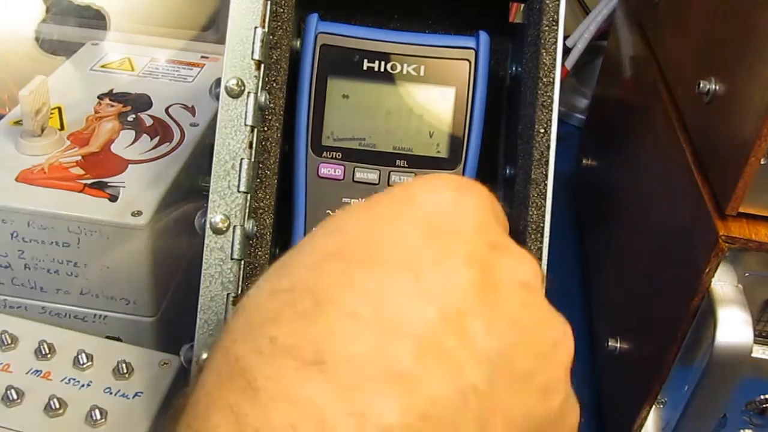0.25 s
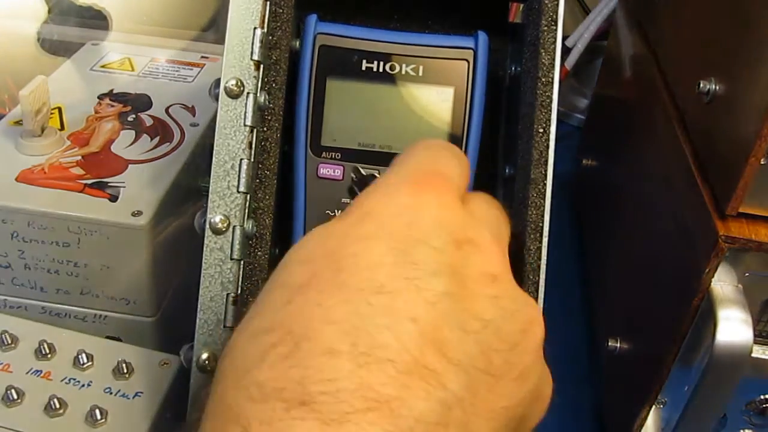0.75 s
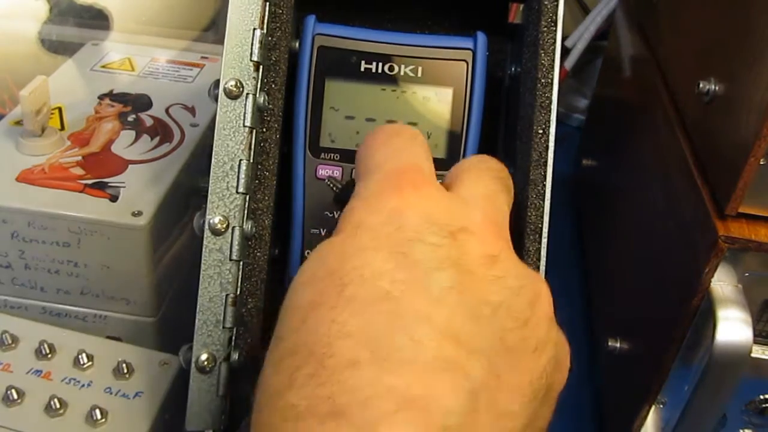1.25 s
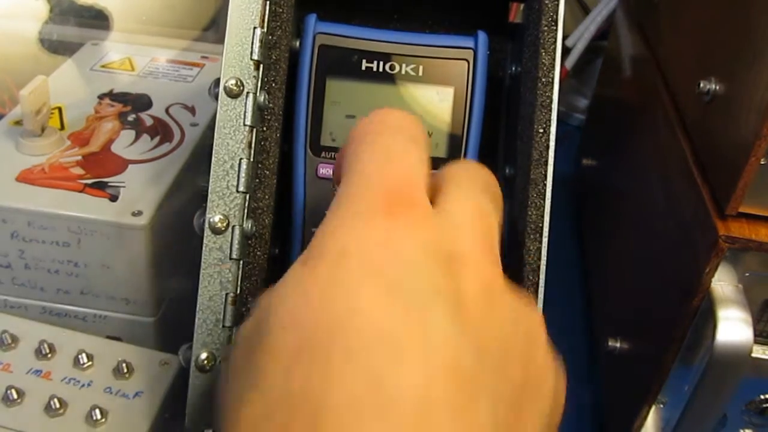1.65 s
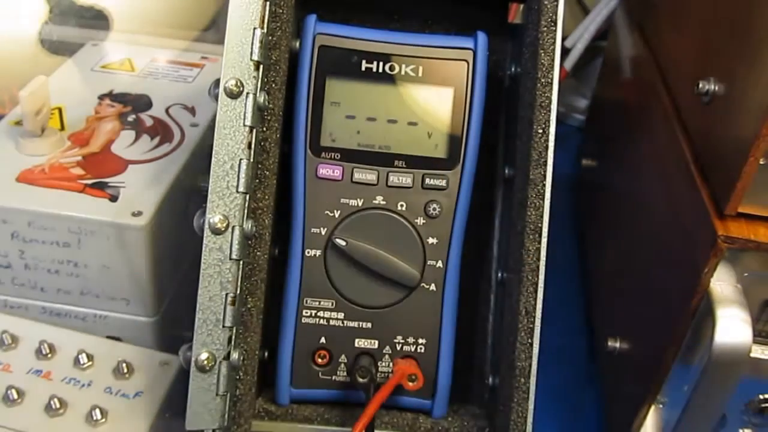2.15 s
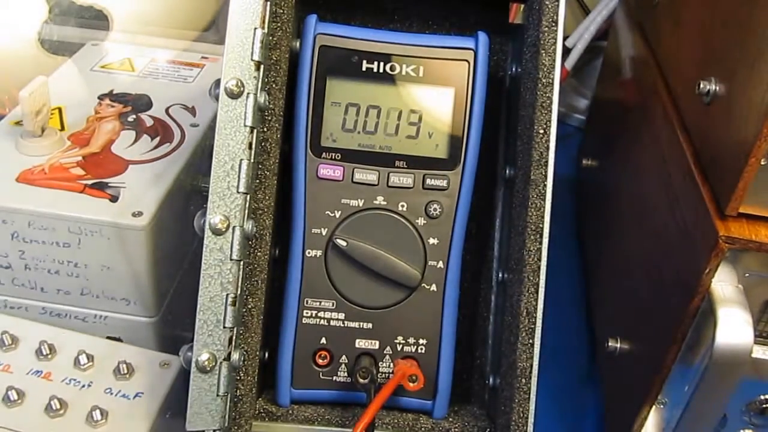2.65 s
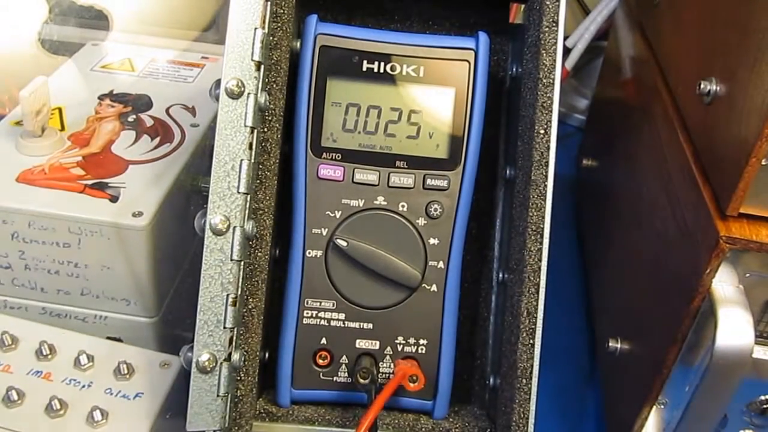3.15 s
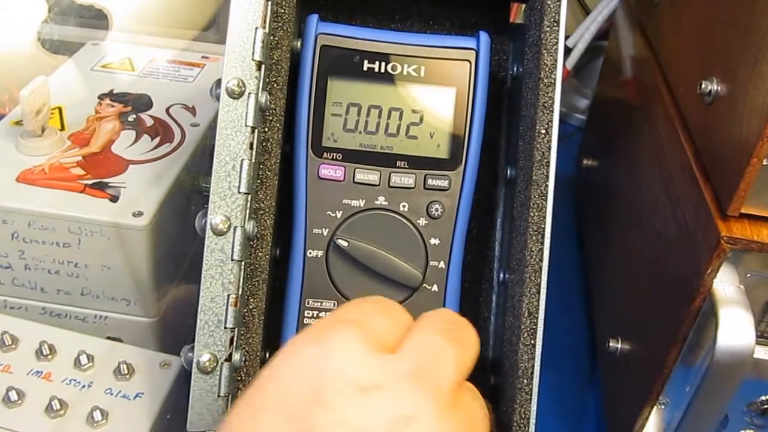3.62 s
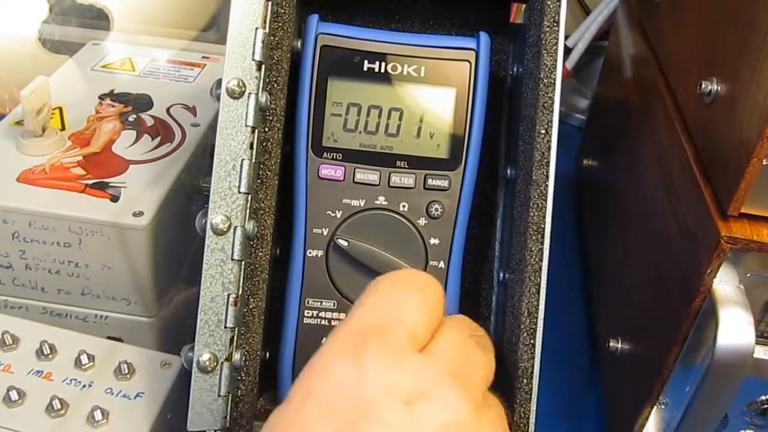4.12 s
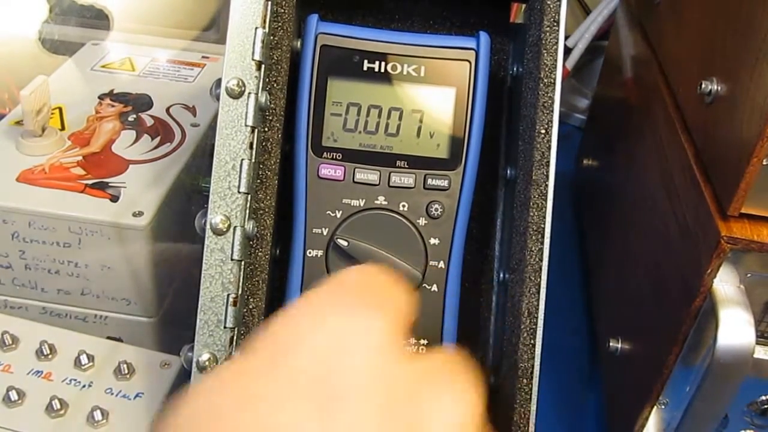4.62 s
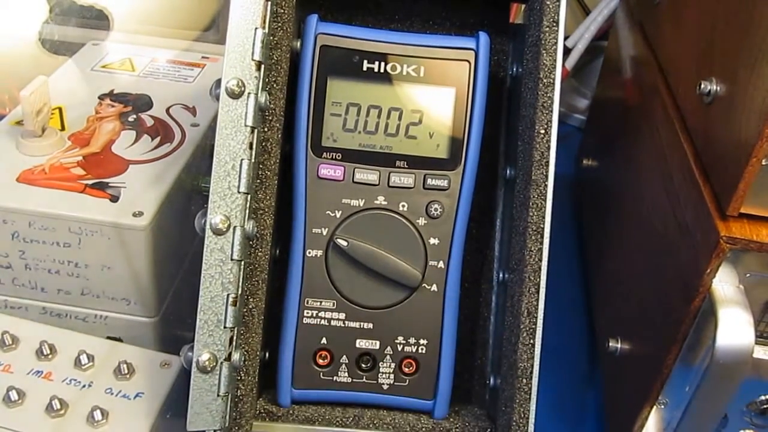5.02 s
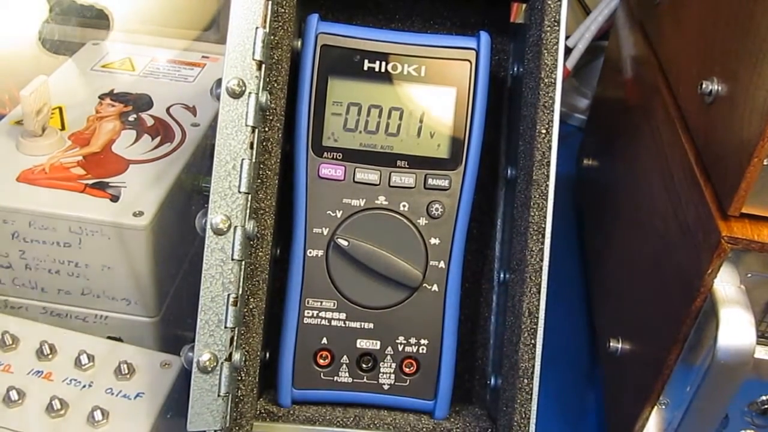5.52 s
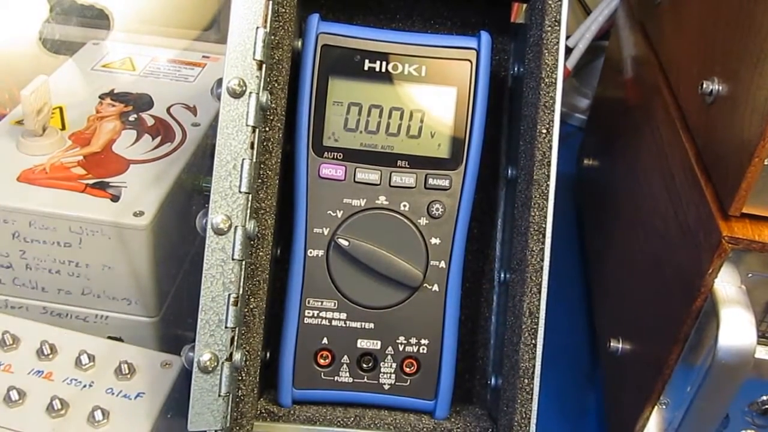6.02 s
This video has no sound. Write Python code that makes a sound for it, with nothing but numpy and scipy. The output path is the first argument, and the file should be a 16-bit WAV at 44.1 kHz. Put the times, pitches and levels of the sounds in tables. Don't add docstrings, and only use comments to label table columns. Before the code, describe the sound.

Six sharp dial clicks, scraping fingers and small plastic knocks as leads come out, then one loud hollow clatter on a bench in a quietly humming room.

```python
import sys
import numpy as np
from scipy import signal
from scipy.fft import rfft, irfft
from scipy.io import wavfile
from scipy.ndimage import uniform_filter1d

SR = 44100
rng = np.random.default_rng(int(sys.argv[2]) if len(sys.argv) > 2 else 0)


def boost_factor(decibels):
    exponent = np.asarray(decibels, float) / 20
    return 10 ** exponent


def unload_wav(signal):
    wavfile.write(
        sys.argv[1],
        SR,
        np.round(np.clip(np.atleast_2d(signal).T, -1, 1) * 32767).astype(np.int16),
    )


N = 276595

# frequency in Hz, level in dB per Hz.
HUSH = [(12, -32.5), (25, -17), (50, -19), (65, -15.5), (100, -18.5), (135, -15), (175, -18), (230, -18),
        (300, -24.5), (446, -24), (558, -26.5), (1060, -31), (1760, -33.5), (2080, -35), (16000, -54.5)]
# frequency in Hz, level in dB, line width in Hz.
HUM = [(94, -58.5, 9), (120.4, -52.5, 2.5), (149.1, -48.5, 0.49), (212, -61, 19), (240.3, -63.5, 3),
       (1045, -68.5, 16)]
# frequency in Hz, likeness from -1 to 1.
DIFFUSE_COHERENCE = [(60, 0.63), (130, 0.87), (290, 0.79), (640, 0.67), (1410, 0.4), (3100, -0.023),
                     (6820, -0.072), (15000, 0.17)]
# frequency in Hz, likeness from -1 to 1.
NEAR_COHERENCE = [(200, 1), (640, .985), (1400, .87), (3100, .75), (6800, .87), (11000, .8), (15000, .35)]
# frequency in Hz, t60 in seconds.
ROOM_T60 = [(250, 0.17), (700, 0.3), (1800, 0.22), (4600, 0.15), (12000, 0.2)]
# frequency in Hz, width in Hz.
NOTCHES = [(5925, 69), (7825, 290)]

# frequency in Hz, level in dB per Hz.
CLOTH = [(300, -0.5), (700, 0.5), (1500, -1), (3000, 1), (5500, -0.5), (9000, -5), (12000, -12.5),
         (16000, -56.5)]
# peak in seconds, level in dB, brightness in dB, rise and fade in seconds per 10 dB.
RUBS = [(.292, -52, -3, -0.16, 0.05), (.412, -61, -9, 0, 0.5), (1.26, -60.5, -6.5, 0.5, 0.05),
        (1.39, -54, -8.5, 0, 0), (1.56, -57, -22.5, 0, 0.32), (1.66, -58.5, -5.5, -0.14, 0.08),
        (1.95, -64, 1, 0.04, -1.9), (2.4, -52, -16.5, 0, 0.47), (2.92, -53.5, -7.5, 0.49, 0.18),
        (3.272, -55.5, -5, 0.02, -0.1), (3.448, -53.5, 2.5, -0.02, 0.09), (3.74, -58.5, -10, 0.2, 0.65),
        (3.98, -43, -22, 0.14, -0.17), (4.082, -55.5, 8.5, 0.03, 0.05), (4.2, -55, -15, -0.5, 0.4),
        (4.44, -52.5, -1, 0, 0.13), (3.765, -52.5, 5.5, -0.03, 0.12), (5.4, -56.5, -11, 0.35, .5),
        (5.445, -54.5, 1.5, 0.2, 0.2), (5.81, -51.5, -15.5, .5, 0.14), (6.0, -51, -1, 0.3, 0.06),
        (6.06, -53, -25, -0.2, 0.15)]
# start in seconds, peak in dB, t60 in seconds.
SCUFFS = [
    (3.2719, -39.5, 0.41),
    (3.3465, -42, 0.28),
    (4.996, -41, 0.22),
    (5.19, -41.5, 0.58),
]
# peak in seconds, level in dB, brightness in dB, rise and fade in seconds per 10 dB.
DRAGS = [(.3, -57, 7, -0.2, -0.3), (.386, -54, -0.5, 0.15, -0.5), (.612, -46.5, -6, 0.23, -0.24),
         (1.1, -46, -12, -0.3, 0.03), (1.205, -41, 0.5, -0.02, 0.11), (1.39, -49, 4.5, -0.01, 0.02),
         (1.575, -44.5, -1.5, 0.08, 0.01), (3.59, -54, 1.5, 0.03, 0.1), (3.855, -48, -22, 0.1, 0.07),
         (3.965, -45, 2, 0.1, -0.15), (4.2, -43.5, -16, 0.07, 0.2), (4.384, -40.5, 1, 0.04, -0.05),
         (4.31, -46, -3, 0.08, 0), (4.46, -40, -1.5, 0.0551, 0.03)]

# frequency in Hz, width in Hz, level in dB.
CASE = [(682.4, 12, -3.5), (969, 26, -4), (1450, 31, -7.5), (1730, 39, 1), (2720, 990, -6),
        (4840, 160, 5.5), (5286, 260, 4), (6890, 520, 1.5), (7880, 260, 0), (9770, 540, -10),
        (10830, 700, -17), (11630, 600, -31), (12600, 660, -35), (14000, 900, -38), (15300, 600, -33.5)]
# start in seconds, 1.2-4 kHz
# peak in dB, treble against it in dB, ring in Hz, length in ms.
TICKS = [(0.2967, -30.5, -21, 1420, 1.7), (1.2493, -35.5, 1.5, 4300, 1.9), (2.3175, -38, -3.5, 3690, 1.6),
         (3.0555, -30.5, 1, 6560, 0.93), (3.5916, -32, -5, 1430, 3.9), (3.7194, -25.5, -8.5, 3170, 0.56),
         (3.7925, -34, -15, 1520, 8.7), (4.0497, -43, 6, 3600, 2.4), (4.2468, -37, -5, 4200, 1.5),
         (5.4335, -31.5, 9.5, 6300, 0.47), (5.4521, -32.5, 1, 2560, 1.2), (5.9652, -27, -4, 1186, 3.9),
         (6.0227, -33, -6, 1150, 1.1)]
TAPS = [(0.2146, -35.5, -13, 1380, 2.6), (0.389, -29, -15, 1550, 0.66), (0.4756, -46, -4, 1470, 5.8),
        (0.5452, -53, -10, 1500, 2.5), (1.1747, -37.5, -16.5, 1450, 11), (1.5424, -53, -12, 1800, 1.56),
        (3.5765, -36, -8, 1760, 1.5), (3.6444, -38, -3.5, 1220, 2.1), (3.836, -40, 2, 3900, 2.1),
        (3.9855, -29, -9, 2400, 2.8), (4.0178, -42, 5, 1520, 2), (4.124, -33, -18, 1800, 1.4),
        (4.4785, -35, -15, 1830, 3.7), (4.543, -24, -25, 1230, 2.1), (4.5655, -35, -8, 1500, 2.2),
        (5.7195, -28.5, -9, 1540, 4.4), (5.79, -30.5, -6, 2500, 5), (5.919, -25, -5.5, 3790, 2)]
PULLS = [
    (3.9724, -28, 1.5, 2390, 1.2),
    (4.1618, -18, -21, 1990, 0.67),
]
FLICKS = [
    (1.5605, -32.5, -17, 1800, 4),
    (1.5848, -12, -12, 2900, 0.33),
    (1.648, -35, -10, 2270, 4.7),
    (3.7468, -42.5, 0, 1320, 5.2),
    (3.803, -38, -15, 2900, 1.7),
    (3.886, -38.5, -6, 1340, 4),
    (4.2855, -43, -14, 1900, 7),
    (4.503, -42, -13, 2600, 2),
    (4.638, -54, 0, 3900, 1),
]
# start in seconds, 1.2-4 kHz peak in dB, bass against it in dB, ring in Hz, length in ms.
KNOCKS = [(1.1879, -38.5, -1.5, 579, 9.2), (1.8827, -32.5, -3, 585, 1.46), (3.8504, -43, 6, 716, 1.1),
          (3.884, -46, 7.5, 685, 2.1), (3.9724, -21, 3, 820, 2.4), (4.1619, -25, 9, 790, 2.44),
          (4.1744, -34.5, 12.5, 670, 2.4), (4.2205, -43, 14.5, 817, 3.6), (4.2976, -42, 14, 790, 2.5),
          (4.3789, -31.5, 6.5, 783, 2), (4.4405, -37.5, 11, 660, 6.5), (4.4654, -37, 7.5, 668, 5)]
NUDGES = [(1.655, -43, 8.5, 620, 4), (3.5637, -54.5, 8, 606, 2.5), (3.667, -50, 8, 590, 1.6),
          (3.836, -45, 9.5, 730, 2.1), (3.946, -36.5, 4, 628, 5.7), (3.9862, -32.5, 3.5, 626, 2.2),
          (4.066, -43, 8, 650, 4), (4.188, -46, 13, 800, 2.2), (4.232, -47, 14, 706, 2.8),
          (4.37, -36.5, 5.5, 930, 6.4), (4.4222, -39, 4, 760, 3.8), (4.455, -42.5, 14, 680, 2.4),
          (4.508, -40.5, 8.5, 770, 3.4), (4.522, -41.5, 5, 815, 3)]
# start in seconds, peak in dB, ring in Hz, width in Hz.
PINGS = [(.622, -31, 380, 90), (1.036, -33, 400, 90), (1.582, -26, 390, 90), (1.586, -31, 2920, 25),
         (1.0385, -20, 1440, 45), (3.592, -38, 3100, 90), (3.592, -42, 4300, 110), (3.794, -41, 4200, 110),
         (4.247, -40, 3080, 80), (4.478, -40, 4300, 110), (4.379, -36, 2600, 120), (.41, -45, 1010, 15),
         (.7145, -20, 690, 22), (.877, -41, 1500, 60), (1.024, -41, 1550, 30), (1.038, -28, 830, 50),
         (3.85, -32, 700, 25), (5.968, -21, 430, 14), (6.15, -46, 420, 10), (3.9725, -27, 4300, 400),
         (.7695, -17, 2900, 180), (3.885, -33, 720, 45), (5.437, -41, 2650, 30), (5.53, -45, 1050, 15),
         (.624, -25, 720, 30), (4.162, -24, 2500, 150), (4.163, -24, 1800, 90)]
GLINTS = [(1.0384, -20.5, 1750, 120), (3.803, -36, 1410, 120), (3.973, -27, 3000, 250),
          (3.987, -23, 4420, 500), (5.434, -30, 10500, 1490), (5.4345, -38, 13500, 1500),
          (5.8805, -17, 246, 28), (5.872, -27, 140, 25), (4.371, -36, 1800, 150), (4.4535, -32, 690, 35),
          (4.4655, -27, 680, 50), (4.5435, -30, 950, 220), (4.379, -30, 830, 45), (4.511, -36, 760, 50),
          (5.8735, -17, 1163, 30), (5.874, -22, 3300, 300), (5.882, -24, 2340, 120),
          (5.892, -28, 2900, 250), (5.9075, -17, 600, 90), (5.92, -22, 600, 80), (.7135, -24, 3200, 400),
          (.6215, -22, 1470, 60), (5.7205, -31, 3300, 700), (5.721, -33, 4600, 500),
          (5.7285, -32, 3600, 900), (5.7915, -35, 4000, 600), (5.921, -36, 12500, 2500),
          (5.9665, -32, 10500, 2500), (4.1625, -19, 1300, 500), (4.169, -33, 4200, 200),
          (1.205, -40, 1900, 300), (3.951, -36, 3200, 300)]
# frequency in Hz, width in Hz, level in dB.
ZIP_RING = [(3600, 700, -5), (5000, 600, -2.5), (7000, 650, 1), (9300, 700, 1), (12800, 900, -13)]

# frequency in Hz, level in dB, t60 in seconds.
HOLLOW = [(160, -24, .03), (246, -6, 0.073), (303, -13, 0.11), (408, 1.5, .055), (435, -2.5, .08),
          (585, -5.5, 0.063), (668, -11, .07), (934, -13, 0.044), (1168, -10, 0.058), (1490, -17.5, 0.027),
          (1840, -9.5, 0.0154), (2320, -14.5, 0.017), (2900, -11.5, .01), (4046, -13, 0.0056)]
# start in seconds, peak in dB, contact in ms, hardness above 900 Hz in dB.
BOUNCES = [
    (5.872, -2, 2.25, 2),
    (5.8808, -8, 1.5, -1),
    (5.9045, -15.5, 2, 3),
    (5.908, -8.5, 4.3, -4),
    (5.959, -18, 3.7, -9),
    (5.971, -23, 4.5, -2),
]
# time in seconds, level in dB, brightness in dB.
RATTLE = [
    (5.875, -19, -3.5),
    (5.957, -33, 2),
    (5.981, -28, -8),
    (6.013, -41, -7.5),
    (6.08, -54.5, 1),
]

# start in seconds, 2.1-3.5 kHz peak in dB,
# 3.5-6 kHz against it in dB, 6-9 kHz against it in dB, snap length in ms.
SNAPS = [
    (0.622, -10, -16, 1.5, 0.81),
    (0.7135, -12.5, -6, 2.5, 1),
    (0.7694, -7.5, -23, -7.5, 0.93),
    (0.8877, -9.5, -12, -11.5, 1.08),
    (1.037, -12.5, -9.5, -13.5, 1.3),
    (1.5821, -11.5, -8.5, -6.5, 1.65),
]
# four ring frequencies in Hz, 9-16 kHz against the 2.1-3.5 kHz peak in dB.
SPRING_RINGS = [
    (2590, 6730, 8180, 9500, -0.5),
    (2210, 6870, 8350, 11250, -5.5),
    (2860, 7300, 10000, 11780, -12.5),
    (2650, 7400, 9600, 10830, -6),
    (2820, 5600, 11000, 11300, -9.5),
    (2500, 6300, 7000, 10970, -6),
]
# start in seconds, peak in dB, low ring in Hz,
# panel ring in Hz, panel against the low ring in dB.
THUMPS = [
    (0.621, -19.5, 720, 1450, 2.5),
    (0.7125, -15.5, 675, 1430, -5),
    (0.768, -23.5, 589.5, 1630, 4),
    (0.886, -20.5, 990, 1730, 5.5),
    (1.036, -21.5, 586.4, 1515, 8),
    (1.5802, -13.5, 802, 1614, 0),
]
# start in seconds, peak in dB, ring in Hz, width in Hz.
CREAKS = [(.6985, -27, 1300, 130), (.705, -30, 1230, 130), (3.957, -29, 1850, 200), (1.803, -46, 2080, 150),
          (1.838, -48, 2070, 150), (3.84, -38, 2620, 30), (4.545, -31, 4505, 90), (5.454, -42, 2600, 35),
          (5.797, -38, 2530, 40), (5.794, -35, 540, 40), (1.195, -35, 575, 10), (.435, -49, 1500, 9),
          (.3, -46, 600, 12)]


def evened(x):
    return x / np.sqrt(np.mean(x ** 2) + 1e-20)


def read(points, hz):
    f, value = np.transpose(points)
    return np.interp(np.log(hz + 1), np.log(f + 1), value)


def add(mix, s, sound):
    part = mix[:, round(s * SR):][:, :sound.shape[1]]
    part += sound[:, :part.shape[1]]


def paired(a, b, same, hz):
    c = np.clip(read(same, hz), -1, 1)
    return np.array([a, c * a + np.sqrt(1 - c ** 2) * b])


def noise(level_db, same, patchy_db):
    t = np.arange(N // 128 + 6)[:, None] * 128 / SR
    hz = np.fft.rfftfreq(512, 1 / SR)
    a, b, c, d, patches = np.moveaxis(rng.standard_normal((len(t), 257, 5)), 2, 0)
    patches = uniform_filter1d(patches, size=12, axis=0)
    patches = evened(uniform_filter1d(patches, size=9, axis=1))
    z = paired(a + 1j * b, c + 1j * d, same, hz) * boost_factor(level_db(t, hz) + patchy_db * patches)
    return signal.istft(z.transpose(0, 2, 1), nperseg=512, noverlap=384)[1][:, :N]


def rings(modes, lo, hi, size=4096):
    t = np.arange(size) / SR
    x = np.zeros(size)
    for f, width, db in modes:
        if lo <= f < hi:
            x = x + boost_factor(db) * width * np.exp(-np.pi * width * t) * np.sin(2 * np.pi * f * t)
    band = signal.butter(2, [lo * .8, min(hi * 1.25, 16000)], "band", fs=SR, output="sos")
    return signal.sosfilt(band, x)


def knock(ms, bands, rise=0.35, grit_db=5, solid=0):
    u = np.arange(4096) / SR * 1000 / max(ms, .1)
    draw = rng.standard_normal((3, 4096))
    force = draw[:2] * boost_factor(grit_db * draw[2]) * np.minimum(u / rise, 1) ** 2 * np.exp(-u)
    push = rfft(force)
    left, other = push / np.sqrt(uniform_filter1d(abs(push) ** 2, size=40))
    hz = np.fft.rfftfreq(4096, 1 / SR)
    left = solid + (1 - solid) * left
    pair = paired(left, other, NEAR_COHERENCE, hz)
    out = np.zeros((3, 4096))
    for response, db in bands:
        spectrum = rfft(response)
        part = irfft(pair * spectrum)
        part *= boost_factor(db) / (abs(part.mean(0)).max() + 1e-12)
        power = abs(spectrum) ** 2
        fine = abs(uniform_filter1d(power, size=18))
        coarse = abs(uniform_filter1d(power, size=int(650 * 4096 / SR)))
        spread = irfft(np.sqrt(np.where(hz < 4000, fine, coarse)) * np.exp(-2j * np.pi * hz * .003))
        out += np.vstack([part, evened(spread) * np.std(part)])
    return out * np.linspace(1, 0, 4096) ** .5


def grains(body, per_s, size_db):
    size = boost_factor(size_db * np.clip(rng.standard_normal(N), -2, 2))
    slips = rng.random(N) < per_s / SR
    force = np.clip(rng.standard_normal((2, N)), -2, 2) * size * slips
    force[1] = .9 * force[0] + .4 * force[1]
    return evened(signal.oaconvolve(force, body[None])[:, :N])


def strokes(table, resting_db):
    t = np.arange(0, N + 64, 64) / SR
    s, db, bright_db, rise, fade = np.transpose(table)[:, :, None]
    away = np.where(t < s, (s - t) / np.maximum(rise, .002), (t - s) / np.maximum(fade, .002))
    power = boost_factor(db - 10 * away ** 1.19) ** 2
    rest = boost_factor(resting_db) ** 2
    total = power.sum(0) + rest
    colour_db = ((power * bright_db).sum(0) - 12 * rest) / total
    now = np.arange(N) / SR
    return np.interp(now, t, np.sqrt(total)), np.interp(now, t, colour_db)


def automatic_gain_db():
    open_db, snap_dip_db, landing_dip_db = 1.06, -2.5, -8.5
    fall_s, recover_s = 0.021, 0.43
    starts = np.array([row[0] for row in SNAPS + BOUNCES[:1]])[:, None]
    since = np.maximum(np.arange(N) / SR - starts, 0)
    dips_db = np.array([snap_dip_db] * len(SNAPS) + [landing_dip_db])[:, None]
    return open_db + (dips_db * (1 - np.exp(-since / fall_s)) * np.exp(-since / recover_s)).sum(0)


def background():
    t = np.arange(N) / SR
    flat = noise(lambda at, hz: 0 * at, DIFFUSE_COHERENCE, 1.64)
    hush = irfft(rfft(flat) * boost_factor(read(HUSH, np.fft.rfftfreq(N, 1 / SR))), N)
    mix = boost_factor(-50) * evened(hush)
    for hz, db, width in HUM:
        wander = signal.lfilter([1], [1, -np.exp(-np.pi * width / SR)], rng.standard_normal((2, N)))
        swell = 1 + evened(wander[0]) * min(0.011 + width / 20, .5)
        line = swell * np.sin(2 * np.pi * hz * t + 0.28 * evened(wander[1]))
        fade_db_per_s = -1.25 * (hz % 120 < 5)
        mix = mix + boost_factor(db + fade_db_per_s * (t - 2)) * evened(line)
    return mix * boost_factor(automatic_gain_db())


def room():
    echoes_at = np.arange(60, 14900, 20) + rng.integers(0, 20, (2, 742))
    pulses = np.zeros((2, 15000))
    np.put_along_axis(pulses, echoes_at, rng.choice([-1., 1.], echoes_at.shape), 1)
    hz, t, z = signal.stft(pulses, SR, nperseg=128)
    hz = hz[:, None]
    fade = boost_factor(-60 * t / read(ROOM_T60, hz)) + boost_factor(1 - 60 * t / 0.028)
    fade = fade / np.sqrt(1 + (hz / 3800) ** 2)
    tail = signal.istft(z * fade, SR, nperseg=128)[1]
    shared = 0.68 * tail.mean(0) + 0.53 * tail
    return shared / np.linalg.norm(shared[0])


def sleeve():
    gain, bright_db = strokes(RUBS, -77)
    t = np.arange(N) / SR

    def colour_db(at, hz):
        return read(CLOTH, hz) + np.interp(at, t, bright_db) * np.clip(hz / 11000, 0, 1.2) ** 0.64

    cloth = evened(noise(colour_db, DIFFUSE_COHERENCE, 2.3))
    power = (gain * boost_factor(3.0)) ** 2
    for s, peak_db, t60 in SCUFFS:
        power += boost_factor(peak_db - 3.0 - 60 * np.maximum(t - s, 0) / t60) ** 2 * (t > s)
    flicker = boost_factor(1.8 * evened(uniform_filter1d(rng.standard_normal(N), size=500)))
    return cloth * np.sqrt(power) * flicker


def drag():
    gain, bright_db = strokes(DRAGS, -95)
    low = grains(rings(CASE + [(632, 99, 3), (790, 45, 1.5)], 595, 1200), 1200, 4.1)
    damped = [(f, w + 250, db) for f, w, db in CASE]
    high = grains(rings(damped, 1200, 4000), 1500, 4)
    return gain * (boost_factor(-1.5) * low + boost_factor(bright_db - 7.0) * high)


def pings(mix, table, top_hz):
    out = 0 * mix
    for s, db, hz, width in table:
        ring = rings([(hz, width, 0)], min(250, hz), top_hz)
        add(out, s, knock(1.1, [(ring, db)], rise=1.3, solid=.7))
    return out


def zip_slips(mix):
    out = 0 * mix
    start_s, end_s, top_s = 4.0495, 4.096, 4.079
    slips_per_s = (165, 420)
    body = rings(ZIP_RING, 2500, 16000)
    s = start_s
    while s < end_s:
        db = -28.5 - 100 * max((top_s - s) * 3, (s - top_s) * 5)
        add(out, s, knock(0.52, [(body, db + 1.5 * rng.standard_normal())]))
        s += 1 / np.interp(s, [start_s, end_s], slips_per_s)
    return out


def taps(mix, kinds):
    out = 0 * mix
    for table, rise, usual_db, dull in kinds:
        for s, db, own_db, hz, ms in table:
            bass_db, treble_db = (own_db, usual_db) if dull else (usual_db, own_db)
            shift = np.exp(0.14 * rng.standard_normal(len(CASE)))
            body = [(f * k, 0.57 * w + 60, level) for (f, w, level), k in zip(CASE, shift)]
            body += [(hz, 40 if dull else 90 + 0.025 * hz, 7)]
            bands = [(rings(body, 480, 1200), db + bass_db),
                     (rings(body, 1200, 4000), db),
                     (rings(body, 4000, 11500), db + treble_db)]
            add(out, s, knock(ms, bands, rise))
    return out


def bounces(mix):
    out = 0 * mix
    modes = []
    for f, db, t60 in HOLLOW:
        t60 = max(t60, .005)
        modes.append((f, 2.2 / t60, db + 20 * np.log10(t60 / .1)))
    for s, db, ms, hard_db in BOUNCES:
        bands = [(rings(modes, 222, 800), db), (rings(modes, 820, 9400), db + hard_db - 1.0)]
        add(out, s, knock(ms, bands, rise=0.13, solid=0.81))
    t = np.arange(N) / SR
    s, level_db, bright_db = np.transpose(RATTLE)
    low_gain = boost_factor(np.interp(t, s, level_db, left=-120, right=-120))
    high_gain = boost_factor(np.interp(t, s, level_db + bright_db, left=-120, right=-120))
    loose = [(f, w + 150, db + f / 700) for f, w, db in modes]
    out[:2] += boost_factor(-5.5) * grains(rings(modes, 288, 800), 1400, 2.5) * low_gain
    out[:2] += boost_factor(0.6) * grains(rings(loose, 730, 6240), 2500, 3.4) * high_gain
    out = signal.sosfilt(signal.butter(4, 225, "high", fs=SR, output="sos"), out)
    return np.array([boost_factor(.7) * np.roll(out[0], -4), boost_factor(-.7) * out[1], out[2]])


def spring_snaps(out):
    damped = [(f, w + 0.0072 * f, db) for f, w, db in CASE]
    edges = [2100, 3500], [3500, 6000], [6000, 9000], [9000, 16000]
    for (s, db, mid_db, high_db, ms), (*spring, top_db) in zip(SNAPS, SPRING_RINGS):
        shift = np.exp(.05 * rng.standard_normal(len(damped)))
        seated = [(f * k, w, level) for (f, w, level), k in zip(damped, shift)]
        seated += [(hz, 260 if hz < 3500 else 430, 8 if hz < 9000 else -1) for hz in spring]
        levels = db, db + mid_db + 4, db + high_db + 6, db + top_db + 6
        bands = [(rings(seated, *edge), level) for edge, level in zip(edges, levels)]
        add(out, s - .0004, knock(ms * 0.76, bands, rise=2.14, grit_db=5.0))
        add(out, s - .009, knock(7.5, [(rings(damped, 1200, 11000), db - 27)], rise=4.5))


def case_thumps(out):
    t60_s = .065
    earlier = np.maximum(np.arange(4096) - 24, 0)
    for s, db, low_hz, panel_hz, panel_db in THUMPS:
        body = CASE + [(low_hz, 3.8 / t60_s, 6), (590, 70, -4), (panel_hz, 9 / t60_s, 4)]
        low = rings(body, 590, 1200) - rings(body, 588, 1200)[earlier]
        bands = [(low, db), (rings(body, 1061, 1800), db + panel_db)]
        add(out, s + 0.00061, knock(1.22, bands, rise=0.87, grit_db=1.0))


def switch(mix):
    out = 0 * mix
    spring_snaps(out)
    case_thumps(out)
    for s, db, hz, width in CREAKS:
        add(out, s, knock(1.1, [(rings([(hz, width, 0)], 500, 6000), db)], rise=1.3))
    return out


def scene():
    silence = np.zeros((3, N))
    # (table, rise, usual bass or treble dB, dull)
    contacts = ((TICKS, .45, -22, False), (TAPS, .45, -3, False), (PULLS, .06, -3, False),
                (KNOCKS, .8, -6.5, True), (NUDGES, .8, -12, True), (FLICKS, .45, -14, False))
    steady = background() + sleeve() + drag()
    knocks = pings(silence, PINGS, 6000) + pings(silence, GLINTS, 16000) + zip_slips(silence)
    knocks = knocks + taps(silence, contacts) + bounces(silence) + switch(silence)
    echoes = signal.fftconvolve(knocks[2:], room(), axes=1)[:, :N]
    return knocks[:2] + boost_factor(-15.0) * echoes + steady


def low_pass(x):
    return signal.sosfilt(signal.butter(12, 17100, fs=SR, output="sos"), x)


def record(dry):
    x = np.clip(dry, -.93, .93)
    x = signal.sosfilt(signal.butter(10, 16000, fs=SR, output="sos"), x)
    for hz, width in NOTCHES:
        x = signal.lfilter(*signal.iirnotch(hz, hz / width, SR), x)
    return low_pass(x)


dry = scene()
out = record(dry)
unload_wav(out)
```